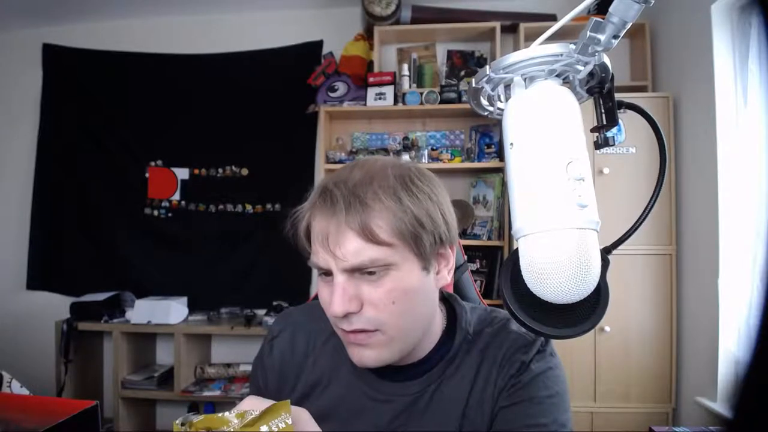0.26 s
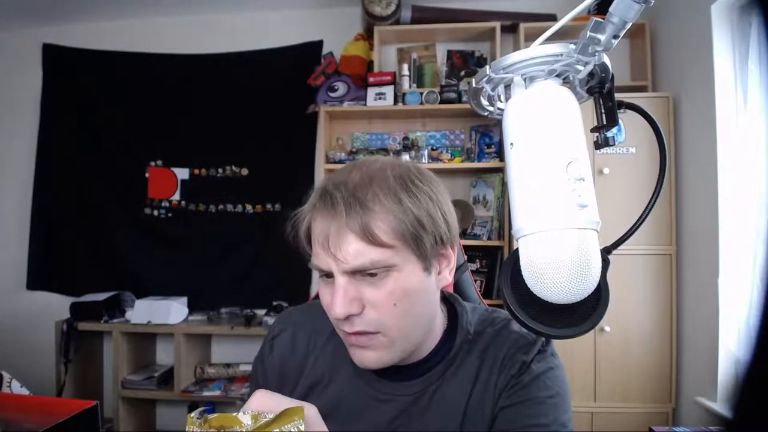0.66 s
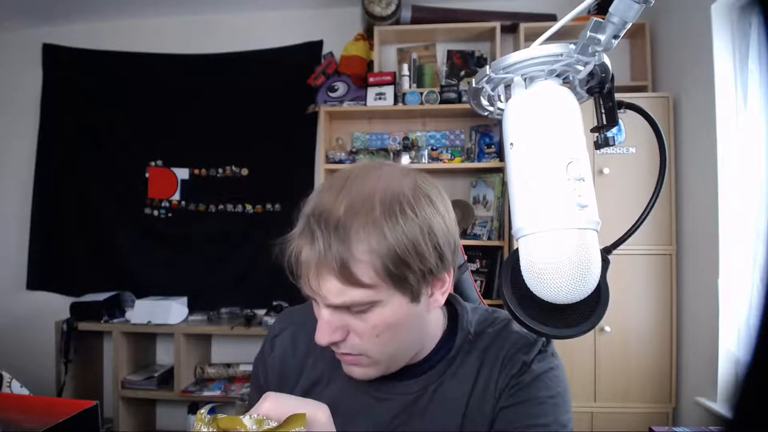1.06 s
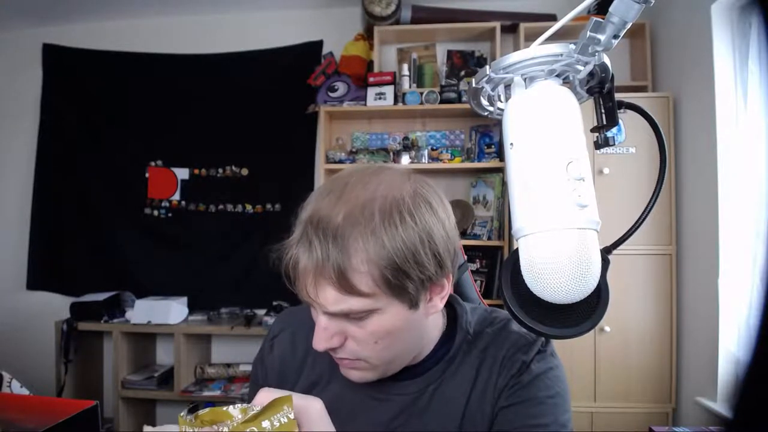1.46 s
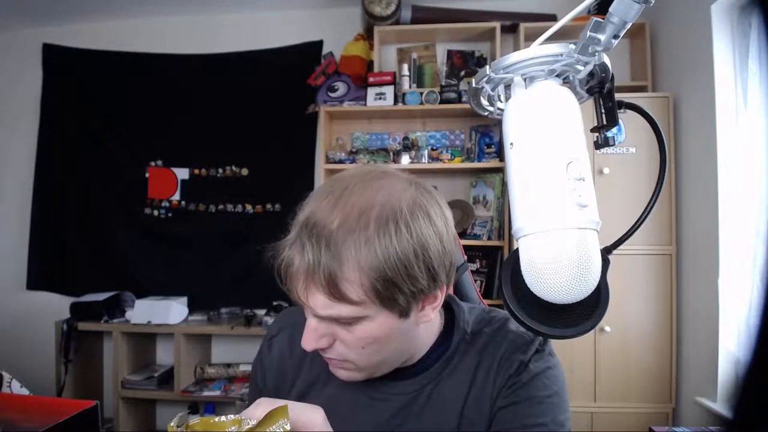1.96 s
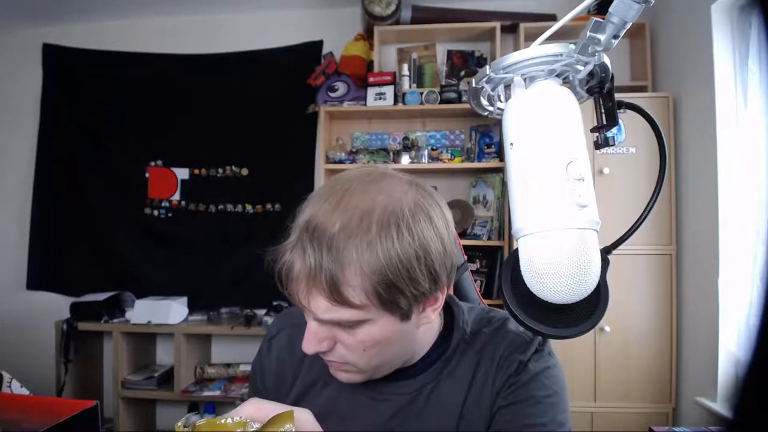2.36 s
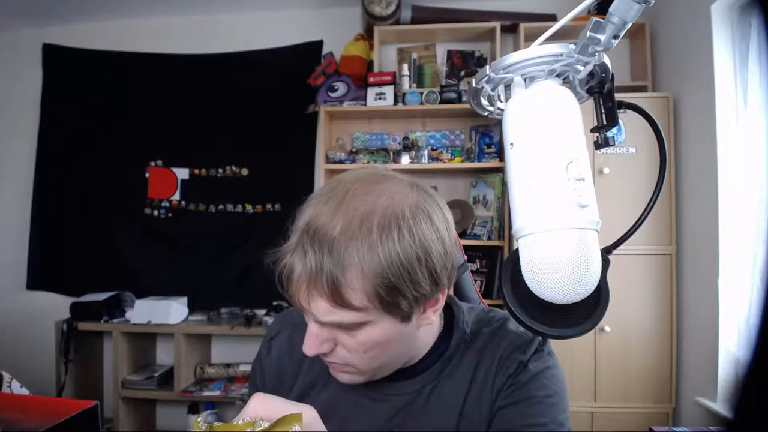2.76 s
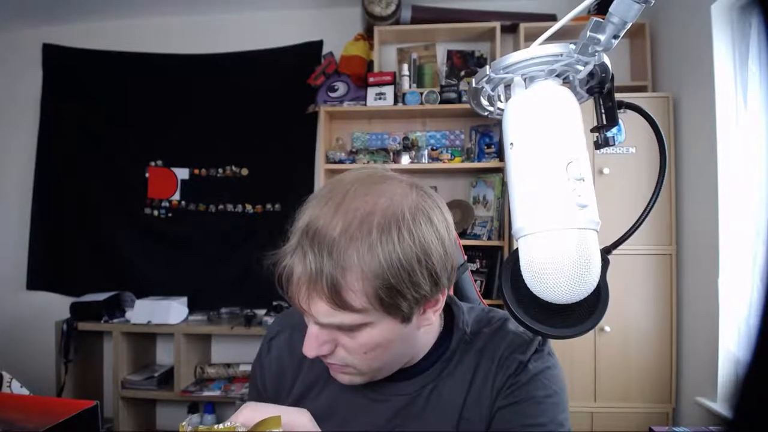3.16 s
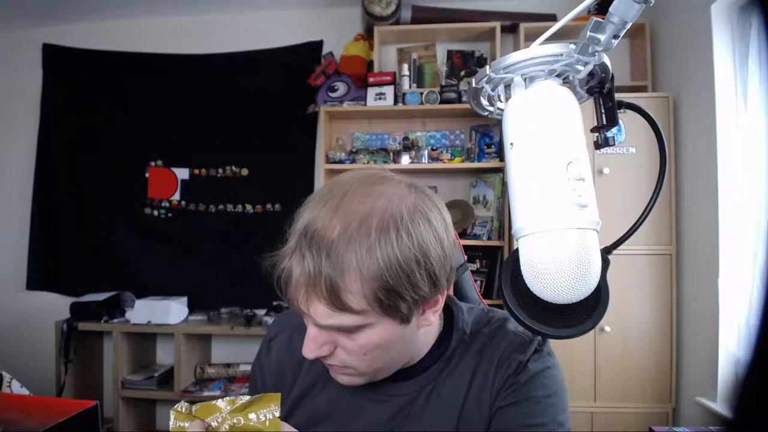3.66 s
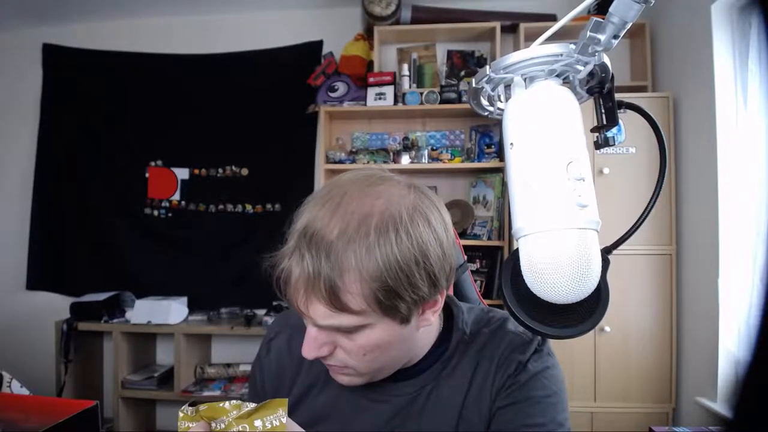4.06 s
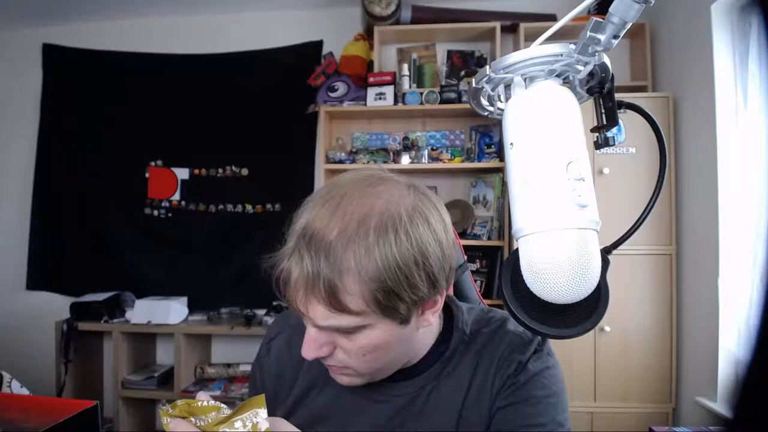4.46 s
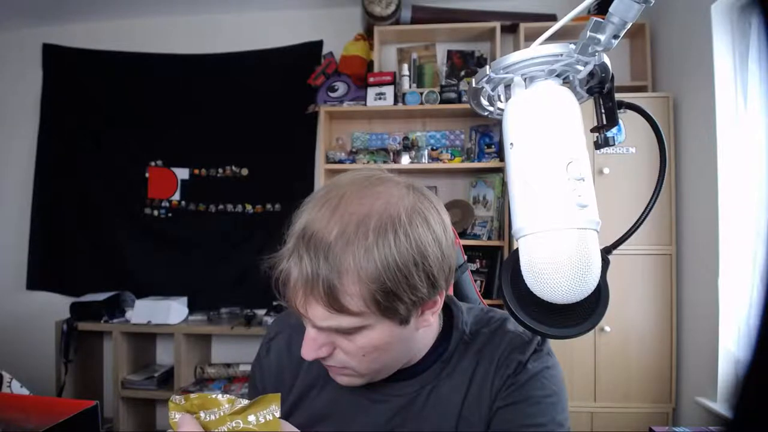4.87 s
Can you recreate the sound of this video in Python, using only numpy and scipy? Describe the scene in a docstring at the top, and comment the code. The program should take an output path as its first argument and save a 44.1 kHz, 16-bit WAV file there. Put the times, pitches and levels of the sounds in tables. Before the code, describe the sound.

Fingers squeeze a crisp foil packet: bright crinkles, snapping creases and soft hollow pops, sparse at first, then denser and louder.

```python
"""Bright ticks and duller pops burst from a sealed foil bag kneaded below a desk microphone.
Each buckling crease sums damped sines and noise bursts: tick, crack, shiver of the sheet, pop of the panel.
Dense trains of small damped sines crackle between them; a taut seam adds even trains of thin ticks.
A small furnished room answers with decaying noise tails; a fan hums quietly in steady room air."""
import sys
import numpy as np
from scipy import signal
from scipy.fft import rfft, irfft, next_fast_len
from scipy.io import wavfile
from scipy.ndimage import uniform_filter1d

SR = 44100
rng = np.random.default_rng(int(sys.argv[2]) if len(sys.argv) > 2 else 0)


def file_out(sig):
    """Save sig as 16-bit WAV at sys.argv[1]."""
    # one column per channel
    cols = np.atleast_2d(sig).T
    # limit, then scale
    lim = np.clip(cols, -1, 1)
    pcm = np.round(lim * 32767).astype(np.int16)
    wavfile.write(sys.argv[1], SR, pcm)


N = 225681
DURATION_S = N / SR
LOWEST_HZ, HIGHEST_HZ = 250, 16000  # pitch limits of the small creases


def amp(db):
    """Amplitude ratio of a level in dB."""
    return 10 ** (np.asarray(db) / 20)


def unit(x):
    """x scaled to an RMS of 1."""
    return x / np.sqrt(np.mean(x ** 2) + 1e-20)


def along(points, hz):
    """Interpolates (frequency [Hz], value) points on a log-frequency axis."""
    point_hz, value = np.transpose(points)
    return np.interp(np.log(hz + 1), np.log(point_hz + 1), value)


def filtered(x, response):
    """x times a complex response of frequency."""
    size = next_fast_len(N + SR // 2)
    spectrum = rfft(x, size) * response(np.fft.rfftfreq(size, 1 / SR))
    return irfft(spectrum, size)[..., :N]


def place(start_s, rows):
    """Sums one short waveform per row, each from its start time."""
    at = np.round(start_s * SR).astype(int)[:, None] + np.arange(rows.shape[1])
    return np.bincount(at.ravel(), rows.ravel(), N + SR)[:N]


def rings(start_s, db, hz, cycles, size):
    """Damped sines that rise for about a cycle and decay by a factor e in the given cycles."""
    turns = hz[:, None] * np.arange(size) / SR
    phase = 2 * np.pi * (turns + rng.random((len(start_s), 1)))
    shape = (1 - np.exp(-turns / 0.38)) * np.exp(-turns / cycles)
    shape = shape / shape.max(1, keepdims=True)
    return place(start_s, amp(db)[:, None] * shape * np.sin(phase))


def puffs(start_s, db, t60, size, hz=0, smooth=1):
    """Noise bursts that fall 60 dB in t60 seconds; smoothed noise on a carrier stays around hz."""
    t = np.arange(size) / SR
    noise = rng.standard_normal((len(start_s), size))
    noise = uniform_filter1d(noise, smooth, axis=1) * np.sqrt(smooth)
    carrier = np.cos(2 * np.pi * np.outer(hz, t))
    return place(start_s, amp(db[:, None] - 60 * t / t60) * noise * carrier)


# room air spectrum: (frequency [Hz], relative density [dB])
AIR_SPECTRUM = [(20, 8.5), (50, -5), (85, 3.5), (200, -5), (300, -7), (1000, -18.5), (1500, -26),
                (4000, -36), (9000, -45), (13000, -59)]
# fan hum bands: (centre [Hz], half-width at half amplitude [Hz], RMS level [dB])
FAN_BANDS = [(163, 13, -73)]


def background():
    """Steady room air as coloured noise; wavering fan hum as narrow-band noise."""
    air = amp(-66.0) * unit(filtered(rng.standard_normal(N), lambda f: amp(along(AIR_SPECTRUM, f))))
    hum = 0
    for centre_hz, half_hz, db in FAN_BANDS:
        band = filtered(rng.standard_normal(N), lambda f: 1 / (1 + ((f - centre_hz) / half_hz) ** 2))
        hum = hum + amp(db) * unit(band)
    return air + hum


# room decay: (frequency [Hz], t60 [s])
ROOM_DECAY = [(300, 0.15), (2000, 0.19), (5500, 0.15), (14000, 0.15)]


def room(x, count=40):
    """Each of count equal stretches of sound gets its own random decaying noise tail."""
    out, step = np.zeros(N + SR), N // count + 1
    delay = round(.003 * SR)
    for k in range(count):
        hz, t, noise = signal.stft(rng.standard_normal(SR // 2), SR, nperseg=256)
        decay = amp(-60 * t / along(ROOM_DECAY, hz)[:, None])
        tail = signal.istft(noise * decay, SR, nperseg=256)[1]
        stretch = x[k * step:(k + 1) * step]
        wet = signal.fftconvolve(stretch, tail / np.linalg.norm(tail))
        out[k * step + delay:][:len(wet)] += wet
    return out[:N]


# bag air and panel modes: (centre [Hz], width [Hz], gain [dB])
BAG_MODES = [(440, 122, -0.5), (1060, 190, -1.5), (1294, 89, -0.5), (1784, 320, -1.5), (1868, 44, 4),
             (2822, 92, -3.5)]


def bag(x):
    """Parallel resonances of the closed bag, alternating in sign."""
    def response(f):
        total = 0
        for k, (centre_hz, width_hz, db) in enumerate(BAG_MODES):
            damping = 1j * f * width_hz
            total = total + (-1) ** k * amp(db) * damping / (centre_hz ** 2 - f ** 2 + damping)
        return total
    return filtered(x, response)


# crack colour of the sheet: (frequency [Hz], gain [dB])
FOIL_COLOUR = [(300, -7.5), (2500, 3), (8000, 12), (11000, -1.5), (15000, 6.5), (17000, -42)]


def foil(x):
    """The broad colour of the thin sheet."""
    return filtered(x, lambda f: amp(along(FOIL_COLOUR, f)))


def crackle(at_s, level_db, count, hz, spread, cycles, uneven_db, size):
    """Small creases at random moments, of random size and pitch, under one level curve."""
    start_s = rng.random(count) * DURATION_S
    pitch_hz = np.clip(hz * np.exp(spread * rng.standard_normal(count)), LOWEST_HZ, HIGHEST_HZ)
    big = np.minimum(rng.exponential(size=count), 3.5)
    grains = rings(start_s, uneven_db * big, pitch_hz, cycles, size)
    return unit(grains) * amp(np.interp(np.arange(N) / SR, at_s, level_db))


# small creases under the fingers, levels before mixing:
# (time [s], panel crackle level [dB], fine crackle level [dB])
KNEAD_LEVELS = [(0.0, -69, -72.5), (0.1, -62, -59), (0.25, -72.5, -74), (0.42, -64.5, -70),
                (0.58, -77.5, -90), (0.71, -67, -85), (0.82, -59, -53), (1.04, -49.5, -57),
                (1.14, -67, -76), (1.22, -63, -62.5), (1.42, -56.5, -61.5), (1.58, -74.5, -87),
                (1.7, -77, -78), (1.85, -79.5, -87.5), (2.17, -73, -81.5), (2.38, -59.5, -59),
                (2.7, -74, -69.5), (2.88, -82, -60.5), (3.0, -66.5, -78), (3.13, -52, -53.5),
                (3.72, -57, -58.5), (3.88, -66.5, -72), (4.04, -59, -59.5), (4.38, -54, -53.5),
                (4.66, -53.5, -62), (4.85, -66, -63.5), (4.95, -64, -61), (5.12, -56.5, -70)]


def kneading():
    """Low panel crackle, partly through the bag, and fine crackle of the sheet."""
    at_s, panel_db, fine_db = np.transpose(KNEAD_LEVELS)
    panel = crackle(at_s, panel_db, count=7000, hz=1018, spread=0.617, cycles=1.2, uneven_db=7.5, size=400)
    fine = crackle(at_s, fine_db, count=30000, hz=5600, spread=.55, cycles=1.1, uneven_db=3, size=96)
    return 0.5 * panel + 0.44 * bag(panel) + fine


LESSER_TICK_DB, LESSER_POP_DB = 9, -4.5  # offsets from the kneading levels
LESSER_TICK_HZ, LESSER_POP_HZ, LESSER_UNEVEN_DB = 5066, 1148, 4


def lesser_creases(count=450):
    """Middling creases buckle at random moments, their levels following the kneading."""
    where, high, low, bright, dull = rng.random((count, 5)).T
    start_s = .01 + where * (DURATION_S - .02)
    at_s, panel_db, fine_db = np.transpose(KNEAD_LEVELS)
    tick_db = np.interp(start_s, at_s, fine_db) + LESSER_TICK_DB - LESSER_UNEVEN_DB * np.log(1.03 - bright)
    pop_db = np.interp(start_s, at_s, panel_db) + LESSER_POP_DB - LESSER_UNEVEN_DB * np.log(1.03 - dull)
    tick_hz = LESSER_TICK_HZ * np.exp(1.1 * (high - .5))
    pop_hz = LESSER_POP_HZ * np.exp(0.794 * (low - .5))
    return buckle(start_s, tick_db, tick_hz, pop_db, pop_hz)


# seam slip trains, nominal tick levels:
# (start [s], end [s], rate [1/s], first level [dB], last level [dB], tick pitch [Hz])
SLIP_TRAINS = [(.766, 0.8, 116, -38.5, -28, 8450), (2.378, 2.396, 344, -50, -51, 9400),
               (2.451, 2.468, 180, -58, -42, 9500), (2.485, 2.515, 81, -34, -40, 9100),
               (2.527, 2.59, 90, -35, -28, 8800), (2.689, 2.742, 86, -38.5, -33, 8700)]
SEAM_POP_DB, SEAM_POP_HZ = -26.5, 1270  # dull side of a slip; level relative to its tick


def slips():
    """A taut seam sticks and slips under a finger: even trains of thin ticks, most of them growing."""
    trains = []
    for first_s, last_s, rate_hz, first_db, last_db, hz in SLIP_TRAINS:
        t = np.arange(first_s, last_s, 1 / rate_hz)
        level_db = np.interp(t, [first_s, last_s], [first_db, last_db])
        trains.append([t, level_db, np.full(len(t), hz)])
    start_s, tick_db, tick_hz = np.hstack(trains)
    return buckle(start_s, tick_db, tick_hz, tick_db + SEAM_POP_DB, np.full(len(start_s), SEAM_POP_HZ))


def aftershocks(start_s, db, hz, count, within_s, spread):
    """Weaker neighbours after each crease (before, if within_s < 0): on average softer and lower further off."""
    late, pitch, scatter = np.moveaxis(rng.random((len(start_s), count, 3)), 2, 0)
    at_s = start_s[:, None] + .0005 + within_s * late
    level_db = db[:, None] - 14 * late + 8 * (scatter - .5)
    pitch_hz = hz[:, None] * np.exp(spread * (pitch - .5) - 0.38 * late)
    return at_s.ravel(), level_db.ravel(), np.clip(pitch_hz, LOWEST_HZ, HIGHEST_HZ).ravel()


def buckle(start_s, tick_db, tick_hz, pop_db, pop_hz):
    """A buckling crease: short tick, broad crack, a shiver of the sheet, and the pop of the panel."""
    # the fold creaks just before it gives
    before = aftershocks(start_s - .001, tick_db - 17.5, tick_hz, count=4, within_s=-0.0048, spread=1.0)
    creak = rings(*before, cycles=0.68, size=128)
    tick = rings(start_s, tick_db - 2.5, tick_hz, cycles=2.8, size=256)
    after = aftershocks(start_s, tick_db - 9.5, tick_hz, count=6, within_s=0.0037, spread=0.68)
    flutter = rings(*after, cycles=1.3, size=128)
    shiver = puffs(start_s, tick_db - 11.5, t60=0.022, size=2048, hz=tick_hz, smooth=5)
    crack = puffs(start_s, tick_db - 5.5, t60=0.0022, size=128)
    rustle = puffs(start_s, tick_db - 26, t60=0.027, size=1024)  # the sheet settles
    pop = rings(start_s, pop_db + 5.5, pop_hz, cycles=1.48, size=1024)
    # the panel shudders on at its pitch
    panel = puffs(start_s, pop_db + 0.67, t60=0.029, size=2048, hz=pop_hz, smooth=70)
    hollow = puffs(start_s, pop_db + 12.5, t60=0.052, size=2048)  # the trapped air sounds on a little
    return creak + tick + flutter + shiver + foil(crack + rustle) + pop + panel + bag(hollow)


# single creases, loud and soft, nominal levels:
# (listed time [s], tick level [dB], tick pitch [Hz], pop level [dB], pop pitch [Hz])
SINGLE_CREASES = [(0.0384, -53, 3540, -50.5, 1670), (0.0477, -19, 8530, -40, 1810),
                  (0.0581, -26, 6380, -57, 1830), (0.0714, -36, 2420, -45, 2050),
                  (0.0814, -33.5, 6960, -45, 2130), (0.0844, -36, 4030, -46.5, 1020),
                  (0.1215, -50, 3050, -48, 1160), (0.1563, -43, 6710, -59, 1130),
                  (0.1786, -43, 7260, -59, 1830), (0.198, -32, 6790, -49, 1830),
                  (0.2324, -40, 2940, -67, 537), (0.3402, -34, 2480, -47.5, 1990),
                  (0.349, -31, 5140, -53, 880), (0.3953, -48, 2420, -50, 780),
                  (0.4268, -41.5, 2840, -55, 520), (0.4617, -48, 2440, -57.5, 1720),
                  (0.4888, -66, 2920, -58.5, 751), (0.5047, -55, 2800, -73, 991),
                  (0.532, -53.5, 2870, -64, 409), (0.5511, -59, 2870, -63, 654),
                  (0.603, -56, 5740, -71, 410), (0.625, -50.5, 2830, -79, 2090),
                  (0.6603, -60, 2830, -75, 544), (0.7349, -50.5, 2800, -52, 860),
                  (0.8124, -29, 7100, -46, 1770), (0.817, -27, 8100, -57, 453),
                  (0.8231, -24.5, 8270, -50.5, 430), (0.8411, -39, 7200, -55, 431),
                  (0.8564, -42.5, 6740, -54, 1110), (0.877, -33, 6270, -45.5, 1090),
                  (0.9112, -35.5, 2450, -41.5, 1690), (0.9396, -37, 2550, -45, 1030),
                  (0.9983, -42, 3250, -44.5, 1720), (1.0159, -37, 2750, -52, 1120),
                  (1.035, -37, 4470, -44, 1020), (1.0493, -33, 3730, -38.5, 970),
                  (1.0748, -37, 2300, -45, 1310), (1.1106, -40, 3260, -63, 1740),
                  (1.126, -49, 6030, -67, 1960), (1.1706, -36.5, 2310, -45, 1770),
                  (1.1782, -22, 8400, -46, 1840), (1.1948, -35, 6960, -43, 1830),
                  (1.214, -33, 6680, -43, 1140), (1.2254, -39, 2340, -52, 496),
                  (1.2689, -32, 6460, -59, 1750), (1.2805, -23.5, 6610, -51, 556),
                  (1.347, -46, 2870, -67, 891), (1.3653, -40, 2860, -51.5, 1660),
                  (1.4336, -36.5, 2730, -52, 500), (1.518, -39, 2870, -52, 2000),
                  (1.541, -41, 3150, -67, 514), (1.6434, -22.5, 6030, -43, 990),
                  (1.6524, -32, 6550, -62, 1850), (1.6666, -56, 6000, -49, 1930),
                  (1.6994, -42, 2690, -53, 1800), (1.7216, -48, 2810, -56, 528),
                  (1.7718, -45.5, 2580, -50.5, 1060), (1.7848, -50, 2200, -57, 1020),
                  (1.9804, -47.5, 4500, -68, 966), (2.063, -53, 2900, -65, 660),
                  (2.0855, -36.5, 2760, -50.5, 1190), (2.1971, -37, 4870, -52, 526),
                  (2.2136, -32, 2800, -42, 950), (2.3036, -46, 2610, -48, 1010),
                  (2.3374, -42.5, 2860, -52.5, 785), (2.4342, -36, 8700, -60, 1740),
                  (2.4723, -33.5, 3300, -47.5, 860), (2.6032, -31, 8400, -72, 2040),
                  (2.611, -37, 8130, -63, 1502), (2.6317, -33, 8400, -76, 2056),
                  (2.6519, -33.5, 8260, -53.5, 1151), (2.6668, -30, 8560, -71, 1003),
                  (2.7299, -36, 7000, -51.5, 970), (2.7568, -34.5, 6900, -58, 510),
                  (2.7735, -31.5, 6960, -58, 980), (2.788, -32.5, 7140, -52.5, 550),
                  (2.797, -18.5, 8370, -42, 1148), (2.829, -37, 7480, -53, 1793),
                  (2.8589, -23, 7950, -42.5, 1850), (2.9018, -35.5, 6500, -69, 1960),
                  (2.943, -48, 3580, -58, 534), (3.0456, -38.5, 3440, -62, 1840),
                  (3.0674, -30.5, 6600, -47.5, 1340), (3.1233, -37, 3400, -43, 1820),
                  (3.138, -29, 3540, -45.5, 1010), (3.1632, -43, 2940, -56, 860),
                  (3.1768, -30, 6170, -60, 1300), (3.1842, -33.5, 3300, -50, 1860),
                  (3.232, -35, 2820, -46, 1240), (3.26, -38, 2630, -44, 511),
                  (3.2806, -33, 6430, -44, 1800), (3.291, -28, 3670, -42.5, 1370),
                  (3.309, -31, 8220, -45, 1020), (3.3234, -29, 8400, -48, 1000),
                  (3.3462, -29.5, 8700, -52, 1000), (3.381, -35.5, 6400, -64, 1020),
                  (3.398, -29, 8450, -52, 830), (3.4216, -22.5, 9230, -36, 1275),
                  (3.4374, -22, 5830, -54, 1880), (3.4654, -39, 4410, -63, 1700),
                  (3.5034, -38.5, 2980, -56, 1030), (3.5681, -21, 6880, -41.5, 1210),
                  (3.582, -42, 6800, -53, 1880), (3.6118, -33.5, 3600, -45, 1030),
                  (3.6251, -24.5, 4740, -47, 1110), (3.6355, -25.5, 5600, -46.5, 1410),
                  (3.6613, -33, 3520, -45, 1320), (3.6851, -38, 3370, -50.5, 990),
                  (3.7531, -37, 8700, -57, 1860), (3.7646, -24, 3490, -48, 1750),
                  (3.818, -42.5, 4000, -61, 520), (3.916, -48, 2200, -63, 505),
                  (3.934, -44.5, 2840, -55, 519), (3.9936, -44.5, 2260, -49, 1810),
                  (4.023, -30, 3430, -42.5, 1040), (4.0424, -33, 5000, -41.5, 450),
                  (4.05, -28.5, 6750, -37, 1600), (4.0554, -29.5, 6740, -39, 1140),
                  (4.0764, -33.5, 2790, -46, 1140), (4.0984, -41, 7640, -53, 939),
                  (4.1061, -34.5, 3220, -45, 1830), (4.119, -32, 3750, -47, 1160),
                  (4.128, -20.5, 6540, -38, 1760), (4.155, -33, 3120, -46, 1800),
                  (4.1689, -33.5, 3700, -41, 1090), (4.1846, -27, 4080, -43.5, 1840),
                  (4.2126, -19, 6540, -39.5, 865), (4.2478, -30, 8630, -50, 1000),
                  (4.2762, -30.5, 6710, -47, 1760), (4.2875, -40, 2400, -47, 1010),
                  (4.3144, -26, 4560, -45, 1190), (4.3211, -22, 4000, -38, 1770),
                  (4.337, -18.5, 4800, -44, 1860), (4.3511, -24.5, 4130, -34.5, 1750),
                  (4.3799, -28.5, 3290, -35.5, 1440), (4.4258, -29.5, 2780, -44, 1810),
                  (4.4515, -22.5, 3130, -45, 1430), (4.491, -27.5, 3850, -41.5, 970),
                  (4.5034, -25, 2660, -45, 990), (4.5466, -37.5, 4400, -54, 1900),
                  (4.557, -38, 3450, -54, 711), (4.5722, -46, 3280, -46.5, 590),
                  (4.5951, -35, 3950, -51, 1820), (4.6063, -25.5, 6500, -40, 890),
                  (4.6209, -30.5, 3070, -49, 505), (4.637, -29, 7200, -58, 1450),
                  (4.6621, -24.5, 7600, -43.5, 1920), (4.7014, -49, 4940, -58, 1740),
                  (4.7625, -24, 6470, -37, 1770), (4.7704, -26, 3970, -51, 1850),
                  (4.8095, -26, 3900, -47.5, 1830), (4.887, -35.5, 3390, -53, 1780),
                  (4.8968, -17, 8080, -40.5, 1760), (4.9131, -21.5, 5400, -38, 1340),
                  (4.9356, -17.5, 5030, -44.5, 2080), (4.9761, -39, 3800, -38, 1360),
                  (5.005, -31, 9340, -54, 1030), (5.0637, -41.5, 6600, -58, 1850),
                  (5.0754, -52, 2240, -45.5, 1760)]
TICK_DELAY_S = .001  # constant delay from listed time to tick


def snaps():
    """Single creases, loud and soft, buckle each a fixed delay after its listed time."""
    listed_s, tick_db, tick_hz, pop_db, pop_hz = np.transpose(SINGLE_CREASES)
    return buckle(listed_s + TICK_DELAY_S, tick_db, tick_hz, pop_db, pop_hz)


SMALL_HZ = 210  # so small a bag radiates little below this


def scene():
    """Bag sounds through a second-order low cut, plus their room tails and the background."""
    near = snaps() + lesser_creases() + kneading() + slips()
    near = filtered(near, lambda f: (1j * f / (SMALL_HZ + 1j * f)) ** 2)
    return (near + amp(-8.0) * room(near) + background())[None]


# microphone capsule treble roll-off: (frequency [Hz], gain [dB])
MIC_ROLLOFF = [(8000, -2.5), (13000, -2), (15500, -12), (16100, -18)]
TOP_HZ = 16800


def record(dry):
    """The treble rolls off, and nothing is kept from the band limit up."""
    return filtered(dry, lambda f: amp(along(MIC_ROLLOFF, f)) * (f < TOP_HZ))


dry = scene()
out = record(dry)
file_out(out)
```